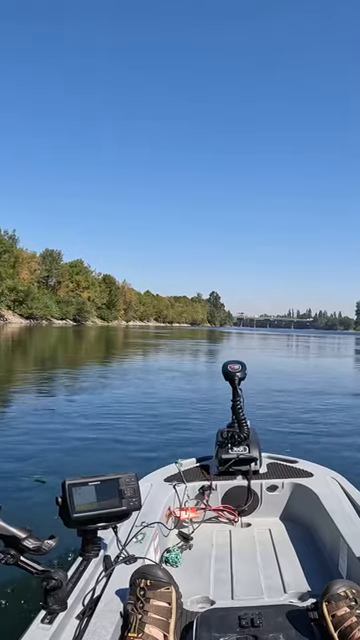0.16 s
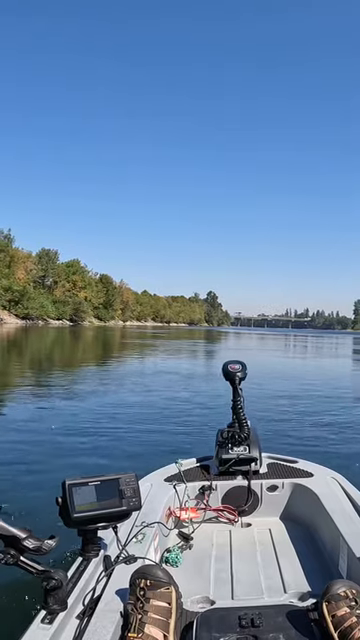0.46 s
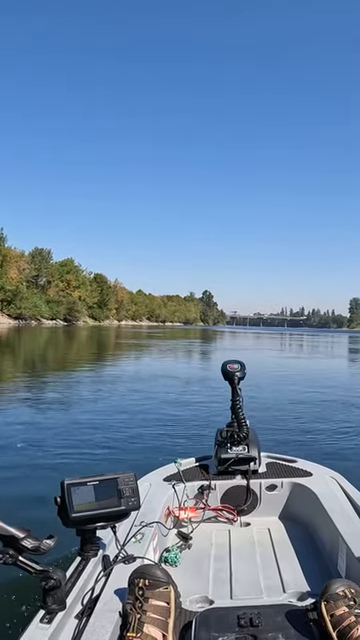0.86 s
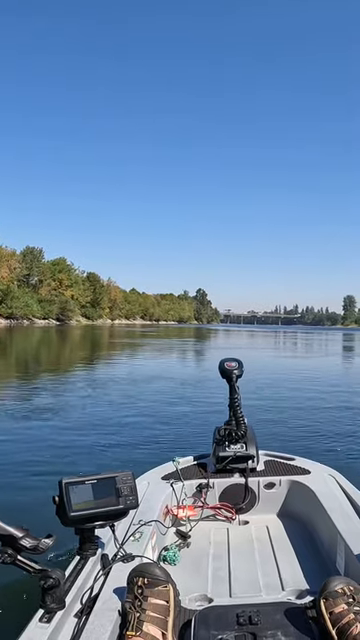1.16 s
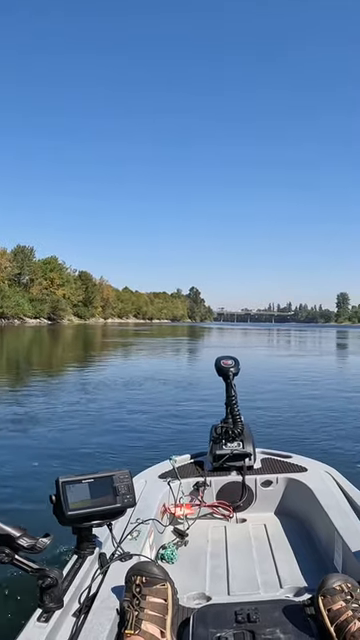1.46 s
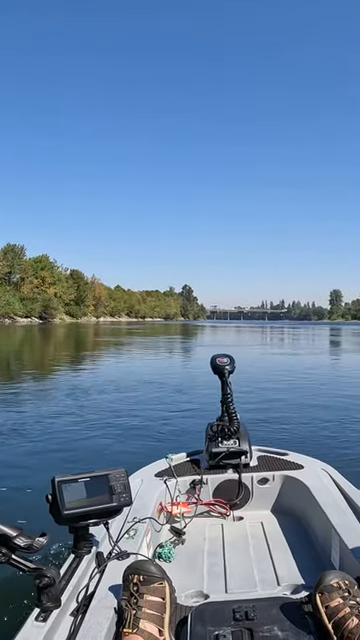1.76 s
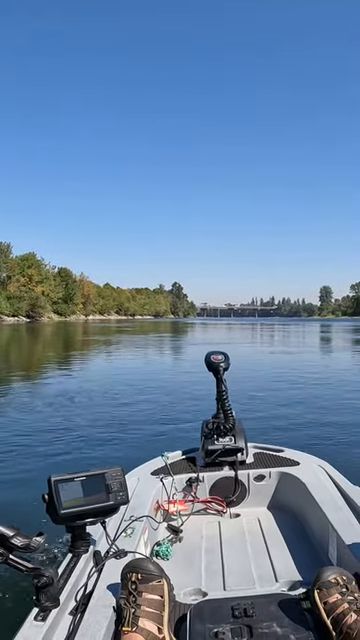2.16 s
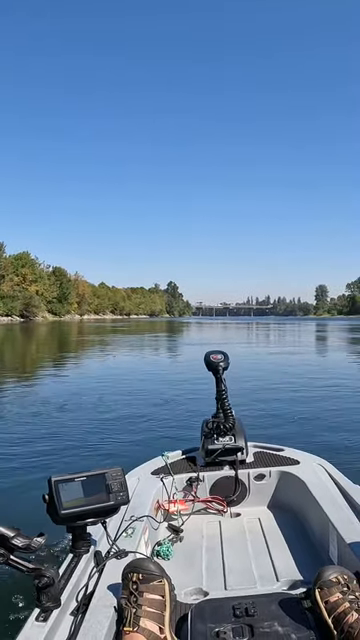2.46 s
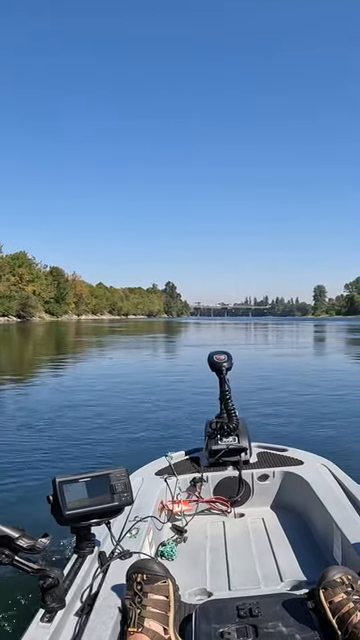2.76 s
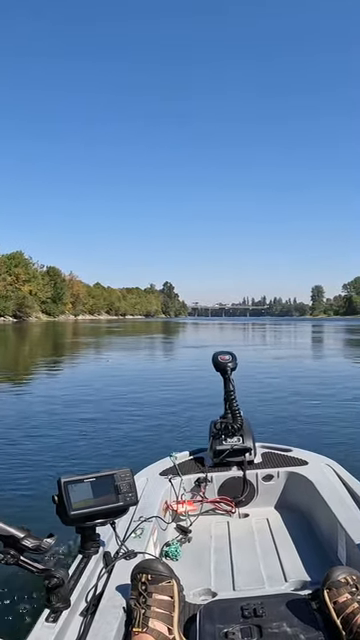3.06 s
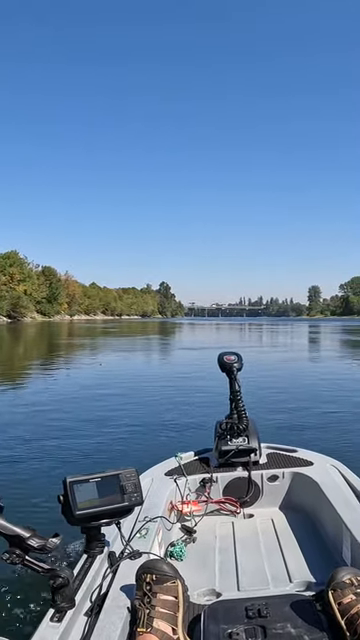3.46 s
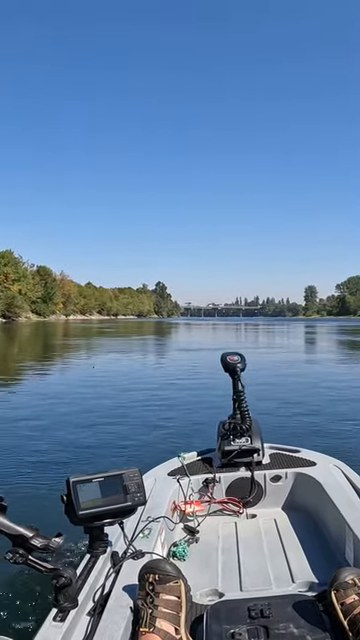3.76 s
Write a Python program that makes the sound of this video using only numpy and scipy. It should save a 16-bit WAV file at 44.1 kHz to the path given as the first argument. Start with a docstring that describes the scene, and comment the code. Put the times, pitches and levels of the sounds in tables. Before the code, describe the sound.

A small boat's motor hums low and close for about four seconds, over steady hull rumble and a soft wash of river water. Small plops and gurgles come near 0.5, 1.2 and from 2 to 3.4 seconds, with faint droplets ticking throughout. Air puffs brush the microphone around 1.2, 2.1, 2.5 and 3.8 seconds. The hum grows slightly louder after 3 seconds and slows a little at the end.

```python
"""On a calm river, aboard a small gliding boat, one microphone close to motor and water.
The motor hums on two low partials and slows a little at the end; under it the hull rumbles.
Water washes along the side, with ringing bubbles, small gurgles and a few droplets ticking.
Puffs of air brush the microphone, and the wake fizzes faintly behind it all."""
import sys
import numpy as np
from scipy import signal
from scipy.fft import rfft, irfft
from scipy.io import wavfile
from scipy.ndimage import uniform_filter1d

SR = 44100
rng = np.random.default_rng(int(sys.argv[2]) if len(sys.argv) > 2 else 0)


def store_wav(level_fs):
    """Save 16-bit WAV to argv[1]."""
    pcm = np.round(np.clip(np.atleast_2d(level_fs), -1, 1) * 32767)
    wavfile.write(sys.argv[1], SR, pcm.T.astype(np.int16))


N = 172431
T = np.arange(N) / SR
FREQS = np.fft.rfftfreq(N, 1 / SR)


def amp(db):
    """Decibels to gain."""
    return 10 ** (np.asarray(db) / 20)


def unit(x):
    """Scales to rms 1."""
    return x / np.sqrt(np.mean(x ** 2) + 1e-20)


def curve(points):
    """Joins (time [s], value) rows by straight lines."""
    return np.interp(T, *np.transpose(points))


def add(mix, start_s, sound):
    """Mixes a sound in at a time."""
    part = mix[max(round(start_s * SR), 0):][:len(sound)]
    part += sound[:len(part)]


def drift(top_hz):
    """Random wandering below top_hz, at rms 1."""
    spectrum = rfft(rng.standard_normal(N)) * (FREQS > 0)
    return unit(irfft(spectrum / (1 + (FREQS / top_hz) ** 4), N))


def colour(x, points):
    """Filters by (frequency [Hz], level [dB]) rows, to rms 1."""
    hz, db = np.transpose(points)
    gain = amp(np.interp(np.log(FREQS + 1), np.log(hz), db))
    return unit(irfft(rfft(x) * gain, N))


def motor(waver_hz=0.089, flutter_db=0.3, hum_trim_db=0.75, upper_trim_db=0.44, third_db=-25):
    """The motor, heard from on board: a hum whose fundamental and upper partials swell separately."""
    # motor speed (time [s], hum pitch [Hz])
    speed = [(0, 109.6), (1.2, 110.2), (1.7, 110.5), (2.35, 110.5), (2.95, 109.3), (3.25, 109.9),
             (3.91, 108)]
    # swell of the fundamental (time [s], level before trim [dB])
    hum = [(0, -28), (.5, -28.5), (.63, -22), (.88, -25), (1.09, -29), (1.25, -23), (1.52, -26.5),
           (1.7, -24), (1.79, -31.5), (1.92, -26), (2.15, -26), (2.32, -24), (2.5, -32), (2.62, -22),
           (3, -25.5), (3.22, -20), (3.3, -22.5), (3.4, -19.5), (3.62, -21.5), (3.77, -23.5), (3.91, -18)]
    # swell of the octave and the faint third partial (time [s], level before trim [dB])
    octave = [(0, -38.5), (.95, -36), (1.22, -29), (1.57, -33.5), (1.72, -27.5), (1.82, -33.5),
              (2.05, -34.5), (2.34, -38.5), (2.43, -30), (2.62, -27.5), (2.98, -26), (3.4, -36.5),
              (3.91, -36)]
    phase = 2 * np.pi * np.cumsum(curve(speed) + waver_hz * drift(top_hz=18)) / SR
    low = amp(curve(hum) + hum_trim_db) * np.cos(phase)
    upper = amp(curve(octave) + upper_trim_db) * (np.cos(2 * phase) + amp(third_db) * np.cos(3 * phase))
    return np.sqrt(2) * (low + upper) * amp(flutter_db * drift(top_hz=5.4))


def rumble(hull_hz=134.2, half_width_hz=11, hull_db=-37.5):
    """Low turbulence of water and air, and one resonance of the hull underfoot."""
    # colour of the turbulence (frequency [Hz], relative level [dB])
    spectrum = [(5, 4), (22, -7.5), (55, 0), (85, -3), (115, -2.5), (160, -6.5), (215, -6.5), (280, -10),
                (360, -12.5), (450, -18.5), (600, -31.5), (1200, -59), (4000, -93.5)]
    # strength of the turbulence (time [s], level [dB])
    churn = [(0, -25), (.6, -24.5), (1.2, -25.5), (1.7, -26), (2.1, -25.5), (2.55, -25), (3, -25.5),
             (3.6, -27), (3.91, -25)]
    hull = irfft(rfft(rng.standard_normal(N)) / (1 + ((FREQS - hull_hz) / half_width_hz) ** 2), N)
    turbulence = amp(curve(churn)) * colour(rng.standard_normal(N), spectrum)
    return turbulence + amp(hull_db) * unit(hull)


def wash(patchy_db=0.61, lap_db=0.14):
    """Water sliding along the side, close by: a dull hiss in shifting patches."""
    # colour of the sliding water (frequency [Hz], relative level [dB])
    spectrum = [(100, -23), (400, -1), (580, 0), (740, 0.5), (1000, -4), (1220, -8.5), (1450, -8),
                (2000, -16.5), (2500, -21), (3200, -23.5), (4100, -30), (5100, -34.5), (6000, -36.5),
                (8000, -43), (10000, -58.5), (14500, -64)]
    # strength of the flow (time [s], level [dB])
    flow = [(0, -36.5), (.3, -36.5), (.7, -37.5), (1.2, -39), (1.7, -39), (2.35, -38), (3, -38.5),
            (3.55, -39), (3.91, -38.5)]
    cells = signal.stft(rng.standard_normal(N), nperseg=512, noverlap=384)[2]
    patches = uniform_filter1d(rng.standard_normal(cells.shape), size=8, axis=0)  # across frequency
    patches = unit(uniform_filter1d(patches, size=22, axis=1))  # across time
    noise = signal.istft(cells * amp(patchy_db * patches), nperseg=512, noverlap=384)[1][:N]
    return amp(curve(flow) + lap_db * drift(top_hz=8)) * colour(noise, spectrum)


def bubble(hz, cycles=3.7, glide=0.028):
    """One bubble: a brief ring that rises a little and falls to 1/e in `cycles` periods."""
    age = np.arange(0, 6 * cycles / hz, 1 / SR) * hz / cycles  # in decay times
    phase = 2 * np.pi * cycles * age * (1 + glide * age / 2)
    return np.sin(phase) * np.exp(-age) * (1 - np.exp(-10 * age))


def glugs():
    """Single bubbles: large ones ring low under the hull, small ones plop beside it."""
    # bubbles at the hull (time [s], level [dB], pitch [Hz])
    plops = [(.495, -23.5, 287), (.523, -43, 2290), (.582, -25, 418), (.9355, -42, 2290),
             (1.121, -42.5, 2210), (1.225, -27, 326), (2.062, -27, 354), (2.769, -42, 2150),
             (3.107, -26, 367), (3.31, -30, 493), (3.397, -28.5, 506)]
    out = np.zeros(N)
    for start, db, hz in plops:
        add(out, start, amp(db) * bubble(hz, cycles=11))
    return out


def gurgles(pitch_spread=0.29, count=14):
    """Tight clusters of bubbles where a ripple folds against the hull."""
    # clusters (time [s], length [s], level of each bubble [dB], centre pitch [Hz])
    clusters = [(0.315, 0.03, -53, 3900), (0.933, 0.012, -49, 2300), (2.34, 0.035, -41.5, 2320),
                (2.74, 0.027, -44, 2190), (3.234, 0.014, -51, 3500)]
    out = np.zeros(N)
    for start, length, db, centre_hz in clusters:
        for when, detune in rng.random((count, 2)):
            hz = centre_hz * (1 + pitch_spread * (2 * detune - 1))
            add(out, start + when * length, amp(db) * bubble(hz))
    return out


def drops(overtone_db=-5.5, snap_db=-6, spray_db=-17.5, spray_s=0.015, spray_hz=6000):
    """Droplets land nearby with a millisecond ping; bright ones add an overtone, a snap and spray."""
    # droplets (time [s], ping level [dB], pitch [Hz], brightness [dB], rise [ms])
    droplets = [(0.173, -40.5, 7100, -24, 0.2), (0.2533, -47.5, 7700, -26, .3),
                (0.3128, -42, 5800, -28, .17), (.9587, -40, 6400, -11, 0.21),
                (1.1246, -44, 6500, -29, 0.25), (1.4148, -58, 13900, -25, .2), (1.8292, -49, 4820, -22, .3),
                (2.139, -51, 4700, -28, .25), (2.3245, -66, 13400, -26, .16),
                (2.741, -63.5, 10800, -16, 0.16), (2.766, -64, 14000, -17, .25),
                (2.904, -54, 6500, -28, .25), (2.9398, -46, 6290, -6, .28), (2.9674, -50, 5830, -28, .35),
                (3.1226, -49, 6400, -31.5, .3), (3.2419, -49, 4740, -23.5, .28),
                (3.5581, -44, 6290, -7.5, 0.23), (3.7468, -49, 6300, -19, 0.27)]
    out, t = np.zeros(N), np.arange(4096) / SR
    highpass = signal.butter(2, spray_hz, "high", fs=SR)
    for start, db, hz, bright_db, rise_ms in droplets:
        age = 1000 * t / rise_ms  # in rise times
        envelope = age * np.exp(1 - age)
        phase = 2 * np.pi * hz * t
        hiss = signal.lfilter(*highpass, rng.standard_normal(len(t)))
        splash = hiss * (amp(snap_db) * envelope + amp(spray_db) * np.exp(-t / spray_s))
        overtone = amp(overtone_db) * envelope * np.sin(2 * phase) * (2 * hz < SR / 2)
        add(out, start, amp(db) * (envelope * np.sin(phase) + amp(bright_db) * (overtone + splash)))
    return out


def gusts(half_length_s=0.038):
    """Soft puffs of air buffet the microphone."""
    # puffs (time [s], level [dB])
    puffs = [(1.04, -30), (1.19, -26.5), (2.07, -22), (2.41, -31), (2.54, -23.5), (3.78, -24)]
    envelope = sum(amp(db) * np.exp(-((T - peak_s) / half_length_s) ** 2) for peak_s, db in puffs)
    return envelope * drift(top_hz=63.5)


def wavelet(peak_s=0.19, half_length_s=0.18, level_db=-43.5):
    """A wavelet breaks up at the bow: a short rush of brighter water."""
    # colour of the rush (frequency [Hz], relative level [dB])
    spectrum = [(300, -14), (800, -2.5), (1300, 4.5), (2000, -13), (3200, -16.5), (5000, -35), (12000, -72)]
    swell = np.exp(-((T - peak_s) / half_length_s) ** 2)
    return amp(level_db) * swell * colour(rng.standard_normal(N), spectrum)


def bubbles(level_db=-55.5, per_s=210, spread_db=10.5, db_per_octave=-7.5, low_hz=800, high_hz=5500):
    """Countless faint bubbles in the wash; the high ones are weaker."""
    out = np.zeros(N)
    pitches = np.geomspace(low_hz, high_hz, 30)
    for hz in pitches:
        hits = rng.random(N) < per_s / len(pitches) / SR
        strength_db = spread_db * np.minimum(rng.exponential(1, N), 3)
        gain = amp(strength_db + db_per_octave * np.log2(hz / low_hz))
        out += signal.oaconvolve(hits * gain, bubble(hz))[:N]
    return amp(level_db) * unit(out)


def fizz(level_db=-79, flurry_db=1, onset_s=0.6):
    """Tiny bubbles burst astern in the wake: a faint, smooth hiss that fades in and wavers."""
    # colour of the fizz (frequency [Hz], relative level [dB])
    spectrum = [(2000, -18), (7000, 0.5), (10000, -11), (14500, -13.5)]
    flurry = amp(flurry_db * drift(top_hz=8)) * np.minimum(T / onset_s, 1) ** 2
    return amp(level_db) * flurry * colour(rng.standard_normal(N), spectrum)


def scene():
    """Boat, air and water at one microphone on board."""
    boat_and_air = motor() + rumble() + gusts()
    water = wash() + wavelet() + bubbles() + fizz() + gurgles() + glugs() + drops()
    return (boat_and_air + water)[None]


def record(dry, edge_hz=15100):
    """The recorder's band limit."""
    lowpass = signal.firwin(511, edge_hz, window=("kaiser", 9), fs=SR)
    return signal.oaconvolve(dry, lowpass[None], "same")


dry = scene()
out = record(dry)
store_wav(out)
```